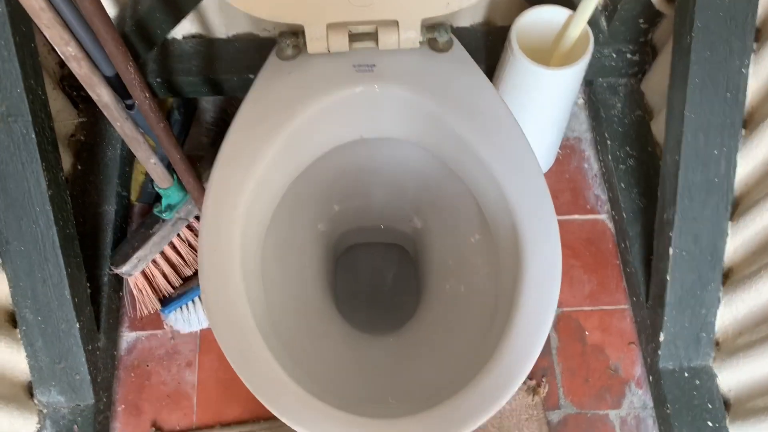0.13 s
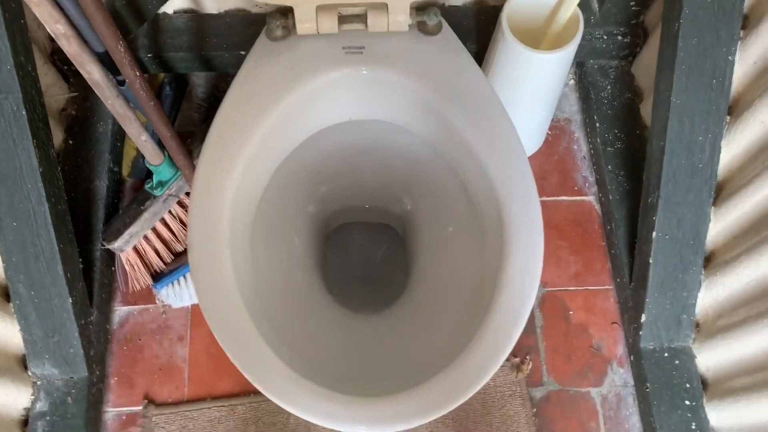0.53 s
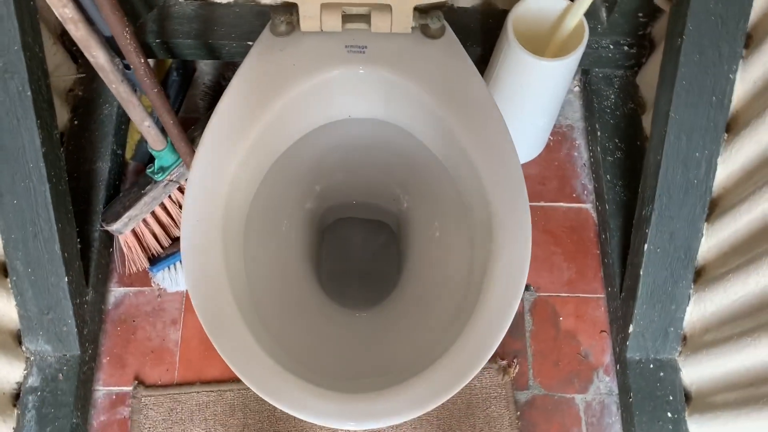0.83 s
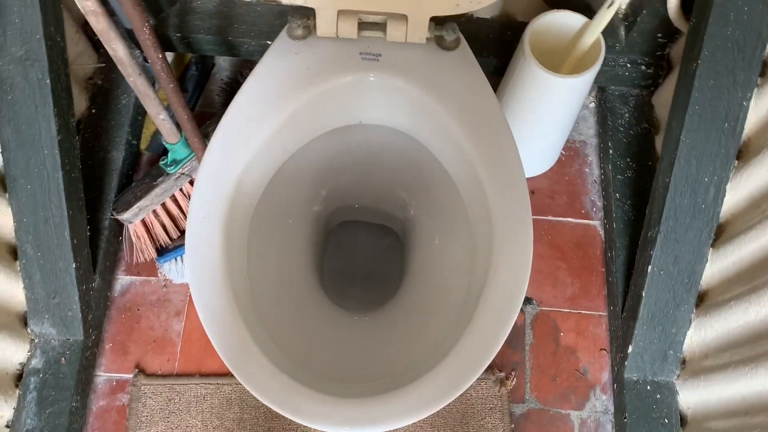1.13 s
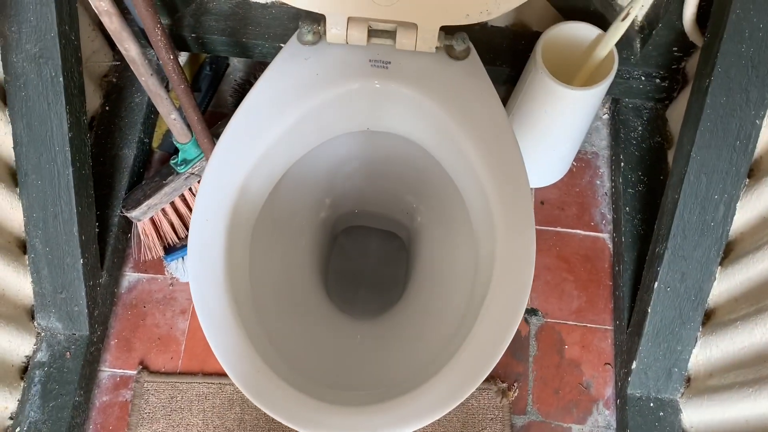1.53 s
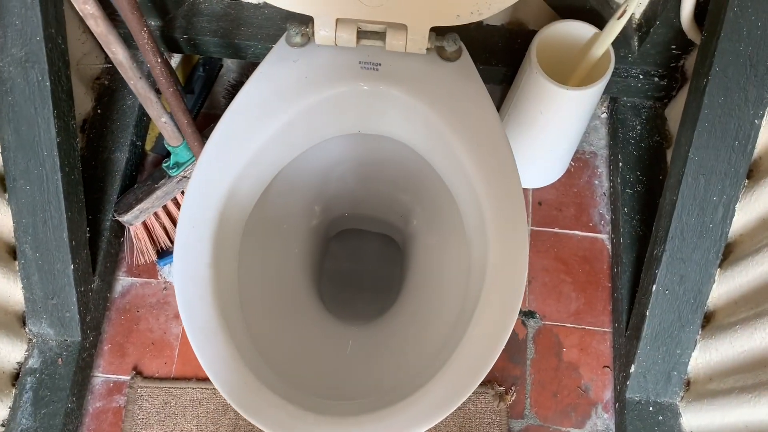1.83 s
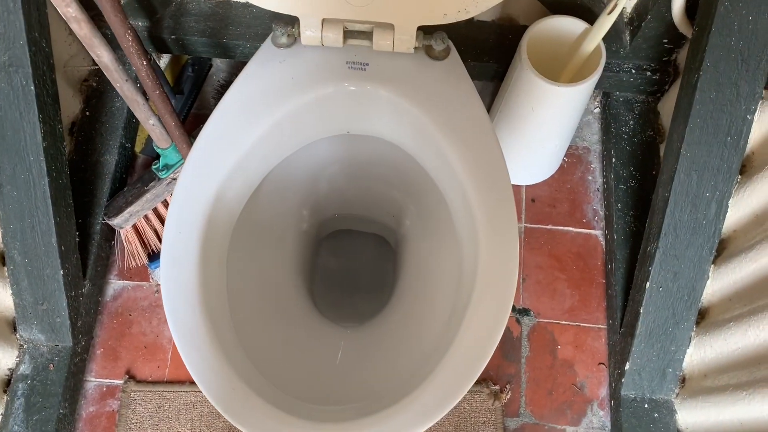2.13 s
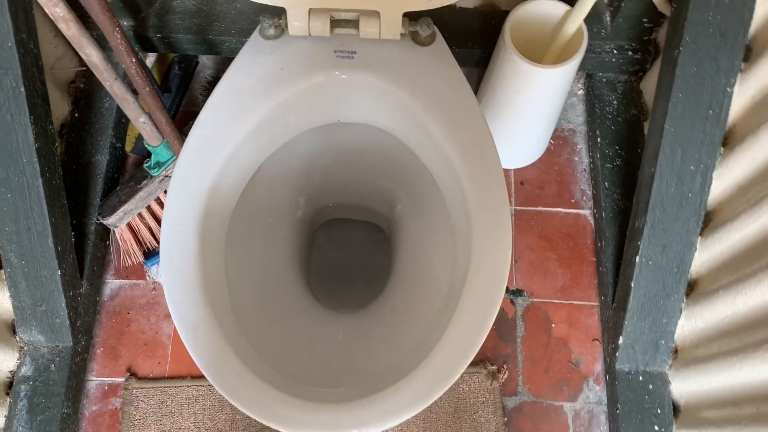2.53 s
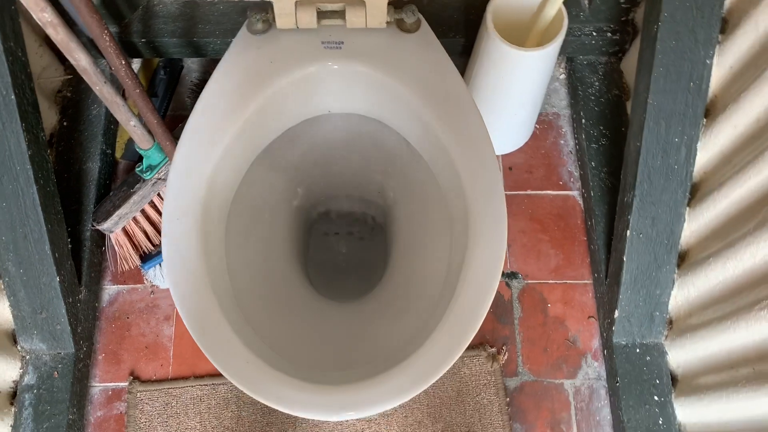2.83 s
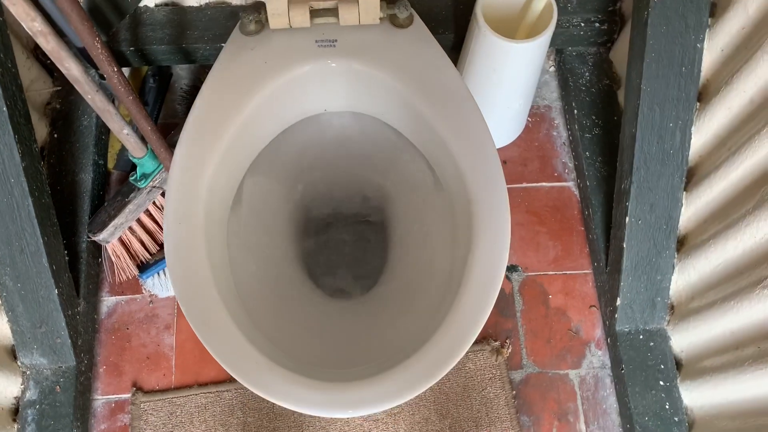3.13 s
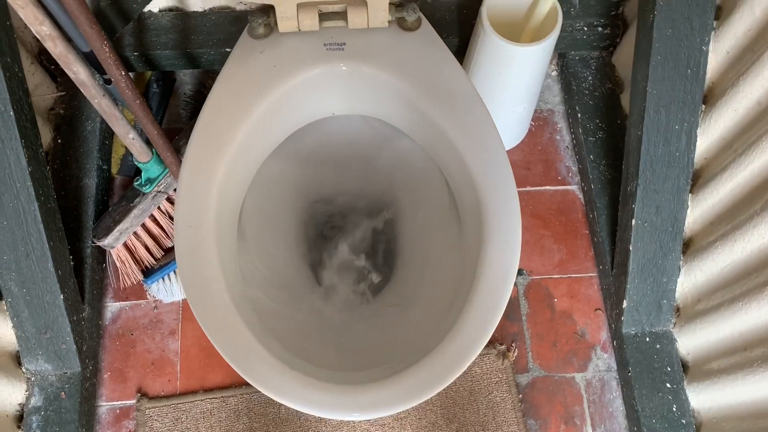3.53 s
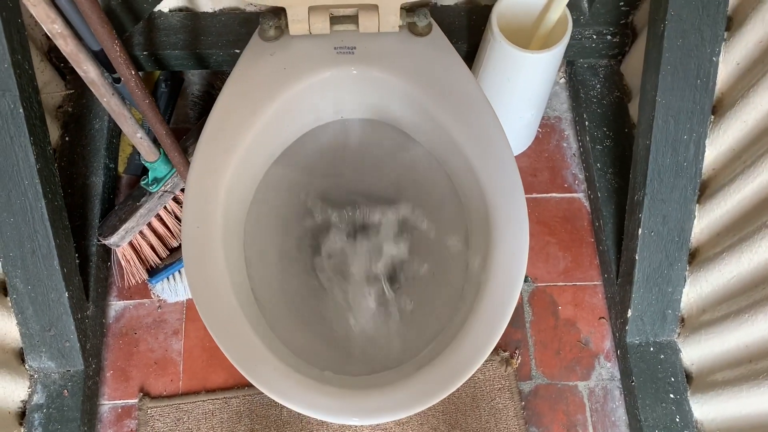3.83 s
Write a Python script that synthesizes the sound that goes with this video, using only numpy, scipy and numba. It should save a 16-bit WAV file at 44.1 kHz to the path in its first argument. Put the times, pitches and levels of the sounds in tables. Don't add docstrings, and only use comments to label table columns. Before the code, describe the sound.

Toilet flush from just above the bowl: a quiet start with tiny taps, dull cistern clunks, a sudden throaty gurgling in the pipe, then splashes and bright spray building until the cut, in a small, short-echo room.

```python
import sys
import numpy as np
from scipy import signal
from scipy.fft import rfft, irfft
from scipy.io import wavfile
from scipy.ndimage import uniform_filter1d
from numba import njit

SR = 44100
rng = np.random.default_rng(int(sys.argv[2]) if len(sys.argv) > 2 else 0)


def unload_audio(sound):
    columns = np.transpose(np.atleast_2d(sound))
    steps = np.round(np.clip(columns, -1, 1) * 32767)
    wavfile.write(sys.argv[1], SR, steps.astype(np.int16))


def makeup_ratio(level_db):
    decades = np.asarray(level_db, float) / 20
    return 10 ** decades


N = 176400
DURATION_S = 4
T = np.arange(N) / SR
SIDES = np.array([[1], [-1]])
SMALLEST_DRAW = .03

# start_s, gulp_db, splash_db, spray_db
FLUSH_LEVELS = [(1.75, -52, -75.5, -90), (1.991, -45.5, -63, -89), (2.03, -38.5, -50.5, -57),
                (2.1, -40, -52.5, -45), (2.16, -44, -60.5, -71), (2.21, -29.5, -45.5, -45.5),
                (2.3, -16, -39.5, -51.5), (2.42, -15.5, -36.5, -45), (2.52, -27, -40, -48.5),
                (2.72, -23.5, -37.5, -41), (2.95, -20, -32.5, -35), (3.08, -21, -30.5, -34.5),
                (3.3, -19, -28, -30.5), (3.45, -18.5, -26, -29.5), (3.6, -22, -30, -27.5),
                (4, -25.5, -30.5, -28.5)]
GULP, SPLASH, SPRAY = 1, 2, 3

# mode_hz, level_db, t60_s
PIPE_MODES = [(164.5, -2.5, 0.18), (240, -3.5, 0.21), (282.6, -0.5, 0.2), (312, -8, 0.31),
              (411.6, -3, 0.088), (490, -3, 0.14), (540.2, -5, 0.15), (617, -2, 0.12), (714, 0, 0.12),
              (778, -2.5, 0.053), (1220, -7, 0.053), (1540, -20, 0.061)]
# start_s, peak_db, pitch_hz
FIRST_POCKETS = [(1.856, -30.5, 398), (1.858, -34.5, 613), (1.885, -33, 560), (1.915, -37.5, 547),
                 (2.108, -26, 630), (2.125, -27.5, 488), (2.293, -13.5, 162), (3.46, -17, 155),
                 (3.967, -17.5, 173)]
# start_s, peak_db, pitch_hz
BIG_POCKETS = [(2.167, -32, 262), (2.189, -25, 291), (2.213, -19, 287), (2.278, -30, 235),
               (2.323, -7.5, 311), (2.373, -8.5, 291), (2.398, -9.5, 275), (2.424, -4.5, 279),
               (2.59, -19.5, 278), (2.665, -15.5, 282), (2.698, -21, 278), (2.739, -16.5, 312),
               (2.802, -11.5, 285), (2.839, -17, 285), (2.897, -13.5, 318), (2.964, -21, 257),
               (2.988, -13, 284.4), (3.017, -17.5, 283), (3.143, -21, 265), (3.182, -22.5, 303),
               (3.203, -20, 312), (3.228, -16, 290), (3.255, -15.5, 299), (3.3, -10, 296),
               (3.331, -11, 280), (3.371, -9, 291), (3.475, -19, 272), (3.502, -27, 261), (3.537, -34, 301),
               (3.573, -25, 320), (3.615, -28, 242), (3.656, -36, 293), (3.705, -21.5, 298),
               (3.749, -31, 249), (3.775, -30, 310), (3.832, -28, 326), (3.899, -28, 274),
               (3.924, -36, 288)]
# start_s, peak_db, pitch_hz
SMALL_POCKETS = [(2.207, -22, 482), (2.255, -15, 622), (2.321, -15.5, 618), (2.365, -11, 701.6),
                 (2.393, -6.5, 614), (2.472, -22, 637), (2.533, -27, 618), (2.557, -26.5, 588),
                 (2.59, -19, 625), (2.617, -18.5, 594), (2.664, -13.5, 488), (2.747, -19.5, 635),
                 (2.8, -16, 615), (2.846, -33, 606), (2.888, -13.5, 557), (2.966, -13, 533),
                 (3.019, -19, 530), (3.058, -19.5, 703), (3.119, -13.5, 526), (3.141, -16, 486),
                 (3.184, -16, 506), (3.228, -13.5, 490), (3.249, -16.5, 507), (3.279, -10, 496),
                 (3.37, -10, 490), (3.422, -13, 478), (3.466, -12.5, 479), (3.505, -18, 476),
                 (3.532, -18, 490), (3.63, -19.5, 490), (3.715, -23, 470), (3.735, -17.5, 480),
                 (3.813, -21, 618), (3.859, -17.5, 490), (3.902, -24.5, 484), (3.928, -20.5, 477)]
# time_s, pitch_hz
CHURN_PITCH = [(2.2, 316), (3.3, 370), (3.55, 490)]
# freq_hz, density_db_per_hz
SURGE_SPECTRUM = [(32, 1.5), (50, -6), (90, -7), (140, -4), (250, -17.5)]

# freq_hz, density_db_per_hz
SHEET_SPECTRUM = [(700, -20), (1000, -6.5), (2000, -1), (3300, -12.5), (4500, -17), (7000, -3.5)]
# start_s, peak_db, centre_hz
SPLASH_EVENTS = [(2.736, -20, 2140), (2.819, -21, 4000), (2.8838, -21, 2330), (2.9794, -16.5, 1820),
                 (3.048, -13.5, 2170), (3.2384, -12, 2020), (3.2965, -11, 2000), (3.468, -32, 1970),
                 (3.55, -19, 1090)]
# freq_hz, density_db_per_hz
SPRAY_SPECTRUM = [(5000, -27), (6500, -9), (8200, 13), (11000, 4.5), (14000, 0), (16000, -17)]
# start_s, peak_db, t60_s
SPIT_EVENTS = [(2.9118, -26, 0.026), (3.0213, -27.5, 0.037), (3.0979, -22.5, 0.03), (3.128, -28, 0.029),
               (3.198, -12.5, 0.012), (3.304, -23, 0.025), (3.3933, -22.5, 0.018), (3.495, -18.5, 0.025),
               (3.811, -13.5, 0.011), (3.9295, -24, 0.016)]

# start_s, peak_db, centre_hz, t60_s
LEVER_KNOCKS = [(1.457, -55.5, 3050, 0.17), (1.53, -43, 2210, 0.096), (1.536, -36.5, 182, 0.64),
                (1.46, -53, 171, 0.33), (1.652, -42, 1870, 0.19), (1.655, -36.5, 348, 0.34),
                (1.699, -30.5, 194, 0.36),  (1.46, -56.5, 474, 0.58), (1.54, -44, 520, .25),
                (1.8, -38, 162, 0.71), (1.925, -35, 49.7, 0.7), (2.014, -26.5, 2130, 0.16),
                (2.019, -28.5, 170, 0.21), (2.068, -35, 1680, 0.25)]
# mode_hz, level_db, t60_s
VALVE_MODES = [(1538, 9, 0.18), (2130, -7, 0.23), (4800, 3.5, 0.16)]
# start_s, peak_db
VALVE_BLOWS = [
    (2.075, -40),
    (2.095, -37.5),
]
# start_s, peak_db
SEAT_BLOWS = [
    (2.345, -15.5),
]
# mode_hz, level_db, t60_s
SEAT_MODES = [(1544, 2, 0.13), (1208, 2, .1), (920, -5, 0.051)]
# freq_hz, width_hz, level_db
LEAK_BANDS = [(2000, 38, -3), (3460, 72, -15), (4330, 54, -11), (4710, 53, -10), (5880, 190, -7),
              (6270, 89, -6)]

# start_s, click_db, bump_db
FINGER_TICKS = [(0.103, -60, -62), (0.152, -60, -55), (0.225, -45.5, -54), (0.446, -47, -53),
                (0.478, -31.5, -47), (0.502, -38.5, -44)]
# time_s, level_db
SLEEVE_LEVELS = [(.0, -82), (0.098, -60.5), (.19, -60.5), (.24, -61), (.34, -70), (.42, -98), (.46, -64),
                 (.55, -69), (.7, -78), (1.0, -83)]
# freq_hz, density_db_per_hz
CLOTH_SPECTRUM = [(200, 4), (1000, -7), (1900, -21), (8000, -36), (15000, -35)]

# freq_hz, density_db_per_hz
HUSH_SPECTRUM = [(12, -40), (20, 2.5), (44, 15.5), (77, -14.5), (337, -24.5), (450, -30.5), (16000, -71)]
# freq_hz, density_db_per_hz
PORT_SPECTRUM = [(20, 22.5), (300, -12), (2000, -23.5), (15000, -53)]


def unit(x):
    return x / np.sqrt(np.mean(x ** 2))


def walk(rate_hz):
    hold = int(SR / rate_hz)
    steps = np.repeat(rng.standard_normal(N // hold + 1), hold)
    return 1.41 * uniform_filter1d(uniform_filter1d(steps, hold), hold)[:N]


def band(x, hz, width_hz):
    return signal.lfilter(*signal.iirpeak(min(hz, 19000), hz / width_hz, fs=SR), x)


def noise_band(hz, width_hz, second_width_hz):
    return unit(band(band(rng.standard_normal(N), hz, width_hz), hz, second_width_hz))


def bed(spectrum, shared_db, flicker_db, rate_hz):
    hz, db = np.array(spectrum, float).T
    out, swell = 0, walk(rate_hz / 2)
    for f in hz[0] * 2 ** np.arange(0, np.log2(hz[-1] / hz[0]), 1 / 3):
        band_db = np.interp(np.log(f), np.log(hz), db) + 10 * np.log10(f)
        gain_db = band_db + shared_db * swell + flicker_db * walk(rate_hz)
        out = out + makeup_ratio(gain_db) * band(band(rng.standard_normal(N), f, f / 3), f, f / 3)
    return unit(out)


@njit
def grains(n, start, pole, glide, size, steps):
    y = np.zeros(n)
    for g in range(len(start)):
        z, p = size[g] + 0j, pole[g]
        for i in range(start[g], min(start[g] + steps[g], n)):
            y[i] += z.imag
            z *= p
            p *= glide[g]
    return y


def rings(start_s, hz, t60_s, size, glide=0.):
    columns = np.broadcast_arrays(start_s, hz, t60_s, size)
    start_s, hz, t60_s, size = (np.ravel(v).astype(float) for v in columns)
    steps = (t60_s * SR).astype(np.int64) + 2
    w = 2 * np.pi * hz / SR
    pole = np.exp(1j * w - np.log(1000) / steps)
    return grains(N, (start_s * SR).astype(np.int64), pole, np.exp(1j * w * glide / steps), size, steps)


def drops(per_s, low_hz, top_hz, cycles, glide, spread_db):
    when, pitch, rarity = rng.random((3, int(DURATION_S * per_s)))
    hz = low_hz * (top_hz / low_hz) ** pitch
    size = makeup_ratio(-spread_db * np.log(rarity + SMALLEST_DRAW / 2))
    return unit(rings(DURATION_S * when, hz, cycles / hz * 2, size, glide))


def fall(start_s, t60_s, rise_s=.001):
    d = np.maximum(T - start_s, 0)
    return (1 - np.exp(-d / rise_s)) * makeup_ratio(-60 * d / max(t60_s, .002))


def struck(blows, modes, colour_db, spread_s, ring=0.71, soft=0.028, pocket_db=0., wander=0.015):
    rows = np.array(blows, float)
    start_s, db = rows[:, :2].T[:, :, None]
    hz, mode_db, t60_s = np.array(modes).T
    delay, detune, colour = rng.standard_normal((3, len(rows), len(hz)))
    octaves_off = abs(np.log2(hz / np.maximum(rows[:, -1:], 50)))
    size = makeup_ratio(db + mode_db + colour_db * colour - pocket_db * octaves_off) / 2
    start_s, hz = start_s + spread_s * abs(delay), hz * (1 + wander * detune)
    return rings(start_s, hz, ring * t60_s, size) - rings(start_s, hz, soft * ring * t60_s, size)


def flow(column):
    rows = np.array(FLUSH_LEVELS)
    return makeup_ratio(np.interp(T, rows[:, 0], rows[:, column], left=-120))


def churn():
    when, rarity = rng.random((2, DURATION_S * 300))
    start_s = DURATION_S * when
    peak_db = -3 * np.log(rarity + SMALLEST_DRAW)
    pockets = np.c_[start_s, peak_db, np.interp(start_s, *np.array(CHURN_PITCH).T)]
    shaken = struck(pockets, PIPE_MODES, colour_db=5, spread_s=0.006016, ring=1.1, soft=0.13,
                    pocket_db=5.5, wander=.022)
    return unit(shaken * makeup_ratio(2.5 * walk(25.01)))


def drain():
    start_s, hz, t60_s, size, glide = 3.43, 894, .3, makeup_ratio(-16), -.6
    return rings(start_s, hz, t60_s, size, glide) - rings(start_s, hz, t60_s / 4, size, glide / 4)


def pipe():
    pockets = np.vstack([FIRST_POCKETS, BIG_POCKETS, SMALL_POCKETS])
    start_s, db, hz = pockets.T
    t60_s, swell = 0.1, 0.19
    own = rings(start_s, hz, t60_s, makeup_ratio(db)) - rings(start_s, hz, swell * t60_s, makeup_ratio(db))
    modes = struck(pockets, PIPE_MODES, colour_db=1.5, spread_s=0.00296, ring=0.7, soft=0.16,
                   pocket_db=14, wander=0.016)
    burst = sum(makeup_ratio(b - 10.5) * fall(s, 0.093, 0.0057) for s, b, f in pockets if f > 350)
    slosh = burst * noise_band(520, 520, 520)
    return flow(GULP) * makeup_ratio(-3) * churn() + makeup_ratio(2.5) * own + makeup_ratio(-6) * modes + slosh + drain()


def surge():
    mid, side = (bed(SURGE_SPECTRUM, 2.5, 2.5, rate_hz=14) for _ in range(2))
    return flow(GULP) * makeup_ratio(-8.5) * (mid + makeup_ratio(-21) * SIDES * side)


def sheet():
    bubbles = drops(500, 794, 5010, cycles=10.2, glide=0.17, spread_db=6)
    return bed(SHEET_SPECTRUM, 1.5, 2.5, rate_hz=16) + makeup_ratio(-2) * bubbles * makeup_ratio(2.5 * walk(12))


def spray():
    fizz = drops(2500, 9100, 14600, cycles=1, glide=0.15, spread_db=2.5)
    return bed(SPRAY_SPECTRUM, 1.5, 1.9, rate_hz=40) + makeup_ratio(4) * fizz


def water():
    near = sheet()
    splashes = sum(makeup_ratio(db - 6) * fall(s, 0.094, 0.003) * unit(band(near, hz, 0.37 * hz))
                   for s, db, hz in SPLASH_EVENTS)
    spit_gain = sum(makeup_ratio(db + 16) * fall(s, t60_s, 0.0081) for s, db, t60_s in SPIT_EVENTS)
    spits = spit_gain * bed(SPRAY_SPECTRUM, 0, 0, rate_hz=20)
    return makeup_ratio(-2.5) * flow(SPLASH) * near + splashes + makeup_ratio(-3) * flow(SPRAY) * spray() + spits


def lever():
    out = 0
    for start_s, db, hz, t60_s in LEVER_KNOCKS:
        rattle = noise_band(hz, 0.38 * hz, 2 * hz)
        crack = makeup_ratio(-10) * (hz > 1000) * rng.standard_normal(N)
        out = out + makeup_ratio(db - 8) * fall(start_s, t60_s, 0.0014) * (rattle + crack)
    valve = struck(VALVE_BLOWS, VALVE_MODES, colour_db=1.5, spread_s=0.0048, ring=0.68)
    return out + valve + struck(SEAT_BLOWS, SEAT_MODES, colour_db=0, spread_s=0.00194)


def leak():
    hiss = sum(makeup_ratio(db) * unit(band(rng.standard_normal(N), hz, 2 * width_hz))
               for hz, width_hz, db in LEAK_BANDS)
    return makeup_ratio(-67.5) * hiss * np.clip((T - 1.76) / 0.096, 0, 1) * np.clip((2.03 - T) / .02, 0, 1)


def sleeve():
    level_db = np.interp(T, *np.array(SLEEVE_LEVELS).T, right=-120)
    cloth = makeup_ratio(level_db) * bed(CLOTH_SPECTRUM, 1.5, 2.5, rate_hz=47.2)
    squeak = makeup_ratio(-66 + 1.5 * walk(29)) * unit(band(rng.standard_normal(N), 1640, 130))
    return cloth + squeak * sum(fall(s, 0.16, 0.0093) for s in (.655, 0.715))


def fingers():
    start_s, click_db, bump_db = np.array(FINGER_TICKS).T
    clicks = sum(makeup_ratio(db - 6) * fall(s, 0.011, 0.00024) for s, db in zip(start_s, click_db))
    clicks = clicks * unit(band(rng.standard_normal(N), 730, 3000))
    body = rings(start_s, 560, 0.035, makeup_ratio(click_db - 11.5))
    return clicks + body + rings(start_s, 55.3, 0.028, makeup_ratio(bump_db + 13.5))


def hush():
    level_db = -59
    shared = makeup_ratio(level_db) * bed(HUSH_SPECTRUM, 0.75, 1.5, rate_hz=11.94)
    return shared + makeup_ratio(level_db - 11) * SIDES * bed(PORT_SPECTRUM, 1.5, 1.5, rate_hz=8.5)


def place(x, lag_s, room_db, turn_rad=0.):
    f, d = np.fft.rfftfreq(N + SR, 1 / SR), T[:SR // 2]
    phase = np.pi * f * lag_s + turn_rad / 2 * np.tanh(f / 2550)
    padded = np.pad(x, (0, SR), mode="linear_ramp")
    near = irfft(rfft(padded) * np.exp(1j * phase * SIDES))[:, :N]
    mid, side = rng.standard_normal((2, len(d))) * makeup_ratio(-60 * d / 0.089) * (d > .002)
    side = signal.lfilter(*signal.butter(1, 1200, "high", fs=SR), side)
    tail = np.array([mid + side, mid - side])
    tail = signal.lfilter(*signal.butter(4, 4630, fs=SR), tail / np.sqrt(np.sum(tail ** 2) / 2))
    return near + makeup_ratio(room_db) * signal.fftconvolve(x[None], tail, axes=1)[:, :N]


def scene():
    far_rim = makeup_ratio(-2.5) * flow(SPLASH) * sheet()
    out = place(pipe() + far_rim, lag_s=-0.00012, room_db=-5.5) + surge()
    out = out + place(water(), lag_s=0.000282, room_db=1, turn_rad=-1.24)
    out = out + place(lever() + leak(), lag_s=-0.000037, room_db=-5.5)
    return out + place(sleeve() + fingers(), lag_s=.00003, room_db=-3.5) + hush()


def roll_off(x):
    return signal.sosfilt(signal.butter(12, 17090, fs=SR, output="sos"), x)


def record(dry):
    limit = .75
    rounded = limit * np.tanh(dry / limit)
    x = signal.lfilter(*signal.butter(2, 28, "high", fs=SR), rounded)
    mix = signal.sosfilt(signal.ellip(12, .3, 70, 15700, fs=SR, output="sos"), x)
    return roll_off(mix)


dry = scene()
out = record(dry)
unload_audio(out)
```